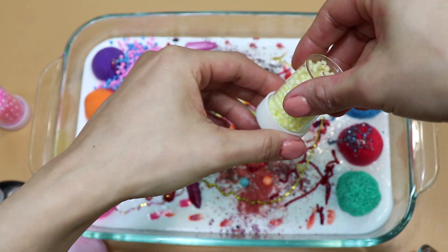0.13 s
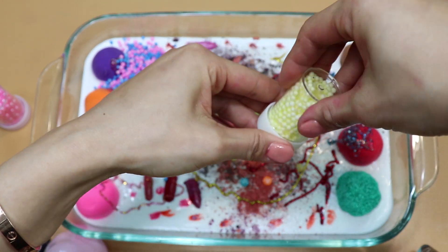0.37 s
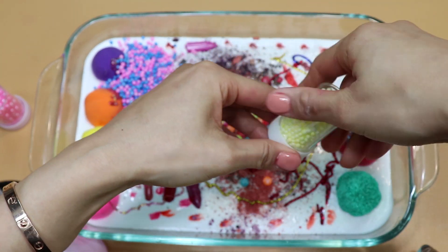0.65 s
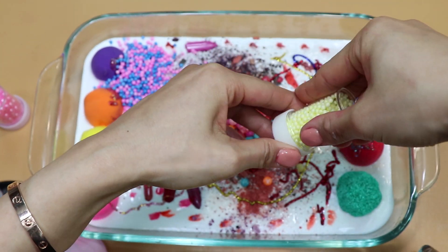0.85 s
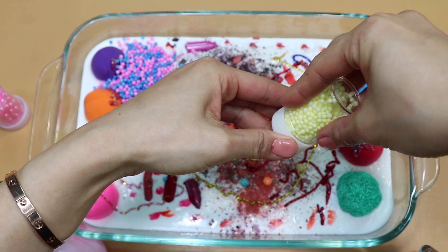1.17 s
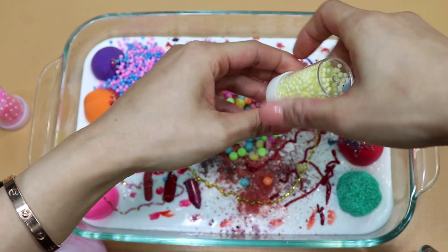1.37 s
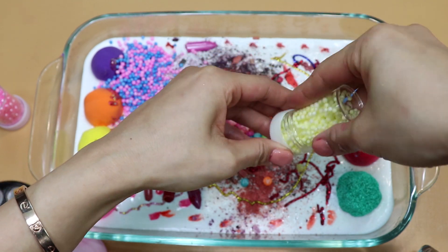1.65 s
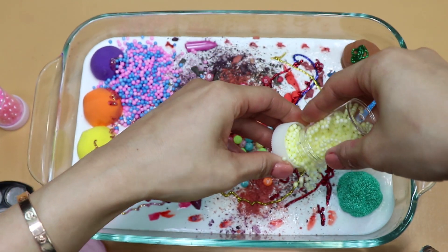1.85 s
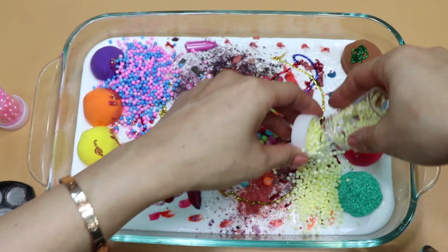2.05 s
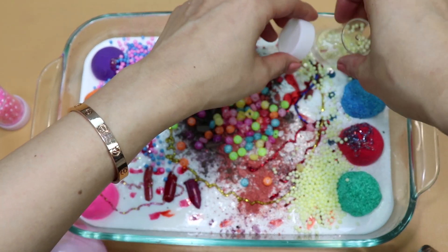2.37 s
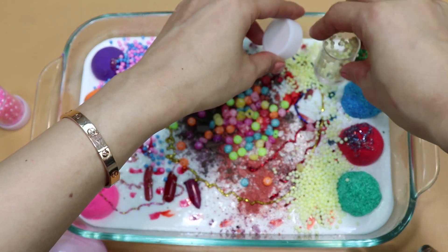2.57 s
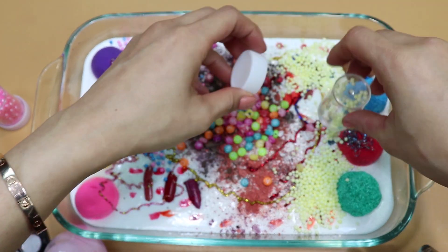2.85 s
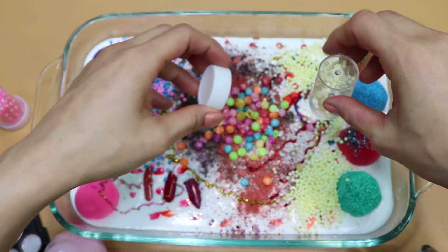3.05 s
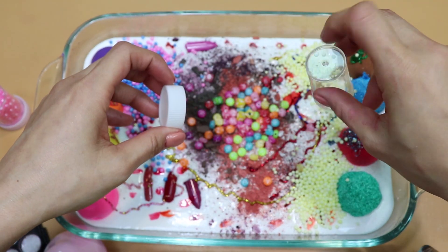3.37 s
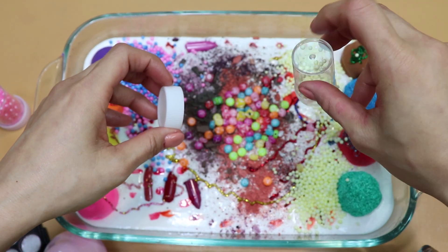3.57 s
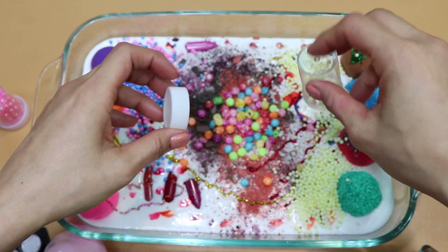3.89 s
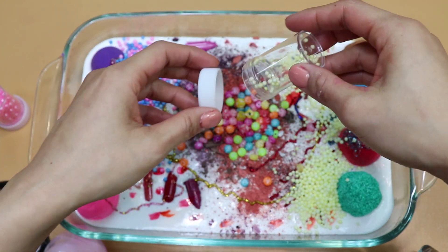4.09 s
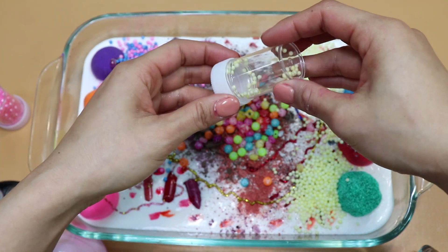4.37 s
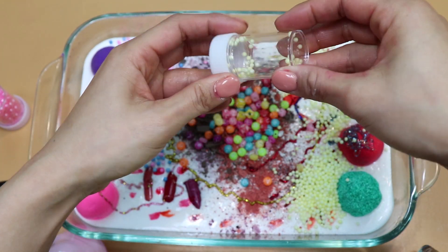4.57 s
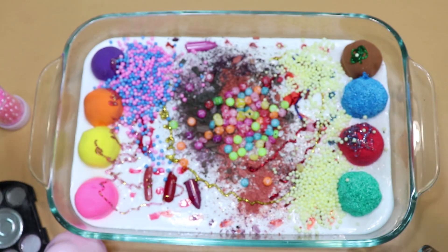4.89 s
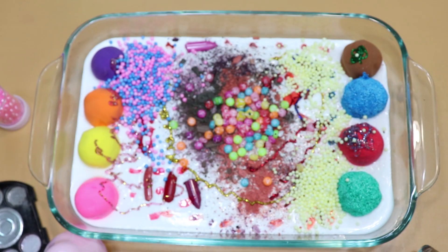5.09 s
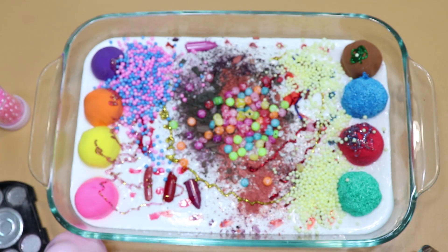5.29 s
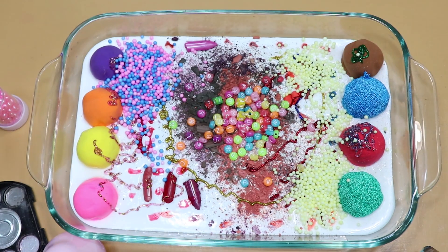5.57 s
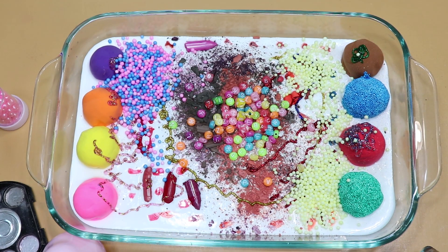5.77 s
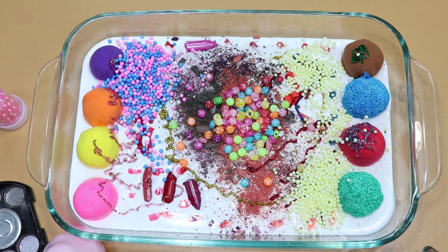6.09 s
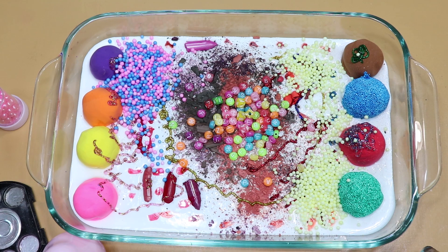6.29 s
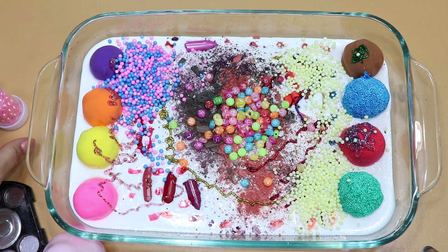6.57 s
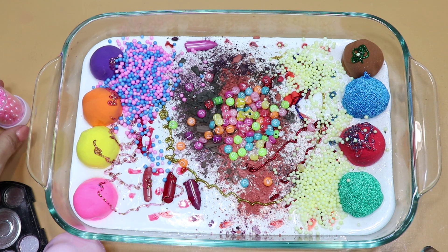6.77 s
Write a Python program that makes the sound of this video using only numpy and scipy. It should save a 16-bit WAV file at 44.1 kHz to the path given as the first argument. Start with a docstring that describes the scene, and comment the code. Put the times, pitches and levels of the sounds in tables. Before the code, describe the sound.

For the first second and a half, fingers slide softly on a small plastic tube, with a few tiny ticks. At about 1.7 seconds the cap pops off with a short, gritty scrape. From 1.8 to 3 seconds foam beads run out in a very faint, fizzy rustle dotted with light ticks. After two small taps near 3 seconds, a fingernail flicks the tube five times between 3.3 and 4 seconds: sharp, bright, quickly dying clicks, loudest near 3.5 and then weakening. At 4.3 seconds the cap goes back on with a smaller click and scrape, followed by soft knocks and rubbing. Faint finger rustle continues, and from 6.6 to 6.9 seconds a hand bumps lightly and scuffs on the table. Everything is close, in a small, quiet room with a steady low hum and hiss.

```python
"""A plastic tube of foam beads

Close up in a small, quiet room, hands turn a little tube, pop its cap, pour out foam beads, flick the
tube with a fingernail and push the cap back on. Flicks and cap are fast-dying resonances of plastic and
air; sliding fingers and running beads are dense grains of friction. A low hum and hiss lie underneath."""
import sys
import numpy as np
from scipy import signal
from scipy.fft import rfft, irfft
from scipy.io import wavfile
from scipy.ndimage import uniform_filter1d

SR = 44100
rng = np.random.default_rng(int(sys.argv[2]) if len(sys.argv) > 2 else 0)


def put_to_file(sound):
    """Save the sound as 16-bit audio at rate SR, in the file named by the first command-line argument."""
    columns = np.atleast_2d(sound).T  # one column per channel
    safe = np.clip(columns, -1, 1)
    whole_steps = np.round(safe * 32767)
    wavfile.write(sys.argv[1], SR, whole_steps.astype(np.int16))


N = 306054

# The tube's voice: the wall's main ring, its upper partner, and the air inside when open.
RING_HZ, OVERTONE_HZ, AIR_HZ = 6453, 12550, 2063


def flicks():
    """A nail snaps on the tube and rings its wall and the air inside, over the thud of the finger."""
    # The wall's modes. Each row: pitch in Hz, level in dB, t60 in seconds.
    wall = [(5000, -19, 0.003), (6030, -0.5, 0.0045), (6800, -7, 0.0025), (7180, 2.5, 0.0058),
            (8000, -7, .003), (8260, 0, 0.0028), (8950, -1, 0.004), (10570, -17, 0.0043),
            (10600, -12, 0.0052), (3280, -30, 0.0037)]
    # Each row: start in seconds, level in dB, left over right in dB, brightness in dB per octave,
    # then ring, overtone, thud and snap in dB relative to the level.
    hits = [(3.0206, -28.5, -2, -10, 8, -2, -1.5, -10), (3.0880, -31, 0, -5, 6.5, -3, -12, 1),
            (3.2961, -3.5, 0, -7, -10.5, -18, -14.5, -8), (3.4813, 0, 0.5, 13, -18, -17, -18.5, -14),
            (3.6698, -4, -0.5, 6.5, -10.5, -11, -18.5, -10), (3.8717, -8.5, -2, -13, -16, -12, -16, -2.5),
            (4.0067, -18.5, -0.5, -22, -9, -16, -16, 5.5)]
    out = np.zeros((2, N))
    for start, db, pan_db, tilt_db, ring_db, overtone_db, thud_db, snap_db in hits:
        place(out, start, struck(wall, tilt_db, rise_s=0.00016), db, pan_db)
        snap = puff(centre_hz=9500, octaves=1.25, t60=0.0068, rise_s=0.0001)
        place(out, start, snap, db + snap_db, pan_db)
        air_db = -33.5 - 0.11 * db  # much the same however hard the blow
        for hz, t60, mode_db in ((RING_HZ, 0.014, db + ring_db), (OVERTONE_HZ, 0.015, db + overtone_db),
                                 (AIR_HZ, 0.012, air_db), (790, 0.0019, db + thud_db)):
            place(out, start, struck([(hz, 0, t60)], tilt_db=0, rise_s=0.00057), mode_db, pan_db)
    return out


def cap():
    """The cap pops off the thread and later seats on the rim; the wider a resonance, the sooner it dies."""
    # Resonances of the pop and the seating. Each row: centre in Hz, width in Hz, level in dB.
    pop_peaks = [(880, 340, 2), (1210, 140, -2), (1740, 390, -1.5), (2750, 1270, 9), (3980, 490, 1.5),
                 (5930, 1100, 0.5), (6930, 650, -5), (8600, 740, -7), (10640, 1100, -4), (13400, 1800, -5)]
    seat_peaks = [(1820, 220, 2), (2250, 500, 5), (2820, 450, -11), (3800, 300, -6), (4810, 200, -2.5),
                  (6570, 110, -6.5), (12400, 800, -35)]
    # Each row: start in seconds, level in dB, left over right in dB, brightness in dB per octave.
    pop_hits = [(1.6495, -36, 0, 1), (1.6833, -4, 1, 1.5), (1.6841, -7, 0, -0.5)]
    seat_hits = [(4.2885, -35, 0, 2), (4.3008, -14.5, -1, 1.5), (4.329, -25.5, 0, -2), (4.333, -38, 0, 6),
                 (4.3405, -26.5, 0, 20)]
    out = np.zeros((2, N))
    for peaks, hits in ((pop_peaks, pop_hits), (seat_peaks, seat_hits)):
        modes = [(hz, db + 20 * np.log10(width), 2.6 / width) for hz, width, db in peaks]
        for start, db, pan_db, tilt_db in hits:
            place(out, start, struck(modes, tilt_db, rise_s=0.00067), db, pan_db)
    return out


def beads(rustle, fizz, ring):
    """Foam beads run out, rubbing the wall and stirring the air in the tube."""
    # The pour. Each row: time in seconds, flow level in dB, fizz in dB relative to the flow.
    pour = [(1.78, -60, -18), (1.93, -61.5, -8), (2.03, -50.5, 0.5), (2.3, -66, -5), (2.38, -64, -6),
            (2.41, -57.5, -3), (2.574, -58, -5), (2.62, -64.5, -4), (2.78, -64, -4), (2.98, -71, -1)]
    times, flow_db, fizz_db = np.transpose(pour)
    t = np.arange(N) / SR
    flow = gain(np.interp(t, times, flow_db)) * (t > times[0]) * (t < times[-1])
    air = resonance(grains(2500, spread_db=4.2, likeness=0.62), AIR_HZ, width_hz=400)
    return flow * (rustle + gain(np.interp(t, times, fizz_db)) * fizz + gain(-16) * ring + gain(-10) * air)


def fingers(rustle, fizz, ring):
    """Fingers slide on the tube, each stroke its own blend of rustle, fizz and rubbed ring."""
    # Each row: peak time, rise and fall in seconds, level in dB, then fizz and ring in relative dB.
    strokes = [(.14, .3, 0.23, -74, -5, -8), (.318, 0.022, 0.034, -57, -2, -7),
               (.415, .04, 0.036, -56.5, -3, -9), (.475, .05, .07, -53.5, -7, -11),
               (.624, 0.031, .025, -61, -8, -8), (.762, 0.06, 0.036, -56, -10, -17),
               (1.25, 1.2, 0.14, -64, -9, -14), (1.402, 0.044, 0.034, -61.5, -8, -9.5),
               (1.598, .13, .04, -55, -8, -15), (4.48, 0.05, .045, -61.5, -4, -13),
               (4.58, .04, 0.037, -71, -10, -1), (4.675, 0.069, 0.058, -56.5, -3, 0.5),
               (4.77, .08, .08, -77, -10, -1), (5.09, 0.47, 0.27, -69, -9, -11),
               (5.24, .04, 0.38, -62, 0.5, -16), (5.62, 0.28, 0.028, -75.5, -11, 11.5),
               (5.68, .05, .25, -67, -17, -10), (6.17, 0.34, .6, -70, -1, -10),
               (6.63, .015, 0.045, -60, -19, -12), (6.81, .1, 0.04, -59.5, -12, -17),
               (6.89, 0.033, .075, -51.5, -8, -20)]
    out = np.zeros((2, N))
    for *shape, fizz_db, ring_db in strokes:
        out += stroke(*shape) * (rustle + gain(fizz_db) * fizz + gain(ring_db) * ring)
    return out


def friction():
    """Rubbed plastic: a broad rustle, a fizz above it, and the wall's two rings kept alive by grains."""
    # Spectra of rustle and fizz. Each row: frequency in Hz, relative level in dB.
    rustle_curve = [(1500, -13), (3500, -6.5), (5500, -1.5), (8000, -5.5), (10500, -11.5), (13000, -17),
                    (16000, -34)]
    fizz_curve = [(6000, -23), (9500, -5.5), (12500, -6), (15700, -12.5), (16200, -38)]
    rustle = colour(grains(9000, spread_db=3.6, likeness=0.65), lambda hz: curve_at(rustle_curve, hz))
    fizz = colour(grains(13000, spread_db=4.9, likeness=0.44), lambda hz: curve_at(fizz_curve, hz))
    ring = resonance(grains(3000, spread_db=5.6, likeness=0.67), RING_HZ, width_hz=180)
    overtone = resonance(grains(3000, spread_db=3.0, likeness=0.49), OVERTONE_HZ, width_hz=800)
    return unit_rms(rustle), unit_rms(fizz), ring + gain(-7) * overtone


def ticks():
    """Ticks, scuffs and dull knocks of skin, nail and plastic; narrow and low ones last longer."""
    # Each row: start in seconds, level in dB, centre in Hz, spread in octaves.
    touches = [(.4554, -37.5, 5840, .27), (.4858, -42, 9000, .9), (0.4967, -30.5, 6400, 1.2),
               (.613, -43, 7400, 1.5), (.623, -42, 6400, 1.5), (.7213, -43, 9000, 0.98),
               (0.8995, -39, 8600, 1.1), (1.517, -43.5, 3100, .7), (1.8208, -37.5, 5500, .66),
               (1.949, -44, 5800, .8), (2.0233, -38, 5830, 0.93), (2.431, -41, 8000, 1.6),
               (2.5182, -36.5, 9000, 1.5), (2.5545, -40.5, 4200, 0.59), (2.655, -48, 4500, 0.27),
               (2.711, -44, 6000, 1.2), (2.7594, -42, 5000, 1.2), (3.4281, -43, 7500, 1),
               (3.4355, -44, 8000, 1.1), (4.4039, -29.5, 550, 1.7), (4.425, -39, 960, 0.97),
               (4.472, -37.5, 4400, .46), (4.576, -36, 1000, 1.6), (4.7638, -44, 4200, .75),
               (6.627, -37.5, 600, 1.16), (6.7465, -40.5, 900, 1.6), (6.7947, -35, 700, 1.03),
               (6.863, -39, 800, 1.4), (6.878, -41.5, 554, 0.22), (6.886, -33, 1500, 0.68)]
    out = np.zeros((2, N))
    for start, db, centre_hz, octaves in touches:
        t60 = 0.011 / octaves * (centre_hz / 6000) ** -0.26
        place(out, start, puff(centre_hz, octaves, t60, rise_s=0.06 * t60), db, pan_db=-1.5)
    return out


def scrapes():
    """Coarse stick-slip grains: the cap's thread scraping, then a hand on the table."""
    # Each row: peak time, rise and fall in seconds, level in dB, brightness in dB per octave.
    drags = [(1.651, 0.0033, 0.032, -44.5, -4.5), (1.684, 0.031, 0.078, -34.5, -4.5),
             (4.336, 0.022, 0.028, -38, -5.5), (4.42, 0.11, 0.041, -50, -14),
             (6.886, 0.041, 0.024, -41, -11)]
    out = np.zeros((2, N))
    for *shape, tilt_db in drags:
        def tone_db(hz):
            roll_off = (1 + (700 / (hz + 1)) ** 6) * (1 + (hz / 12000) ** 4)
            return tilt_db * np.log2((hz + 1) / 1500) - 10 * np.log10(roll_off)
        grit = colour(grains(13000, spread_db=1.1, likeness=0.93), tone_db)
        out += unit_rms(grit) * stroke(*shape)
    return out


def room(near):
    """Early echoes and a short tail; as the hands move, three sets of paths take turns."""
    # The tail's decay. Each row: frequency in Hz, t60 in seconds.
    decay = [(500, 0.15), (1300, 0.33), (3500, 0.22), (9000, 0.26), (16000, 0.2)]
    # Bounces off dish, table and walls. Each row: delay in seconds, level in dB.
    echoes = [(.0022, -15.5), (.0055, -19.5), (0.0129, -18.5), (0.019, -25.5)]
    out = np.zeros((2, N))
    slots = np.arange(130, SR // 2 - 20, 20)  # one random tap in every 20 samples
    for turn in range(3):
        taps = np.zeros((2, SR // 2))
        at = slots + rng.integers(0, 20, (2, len(slots)))
        np.put_along_axis(taps, at, rng.choice([-1., 1.], at.shape), 1)
        hz, t, spectrum = signal.stft(taps, SR, nperseg=256)
        tail = signal.istft(spectrum * gain(-60 * t / curve_at(decay, hz)[:, None]), SR, nperseg=256)[1]
        response = gain(-7) * tail / np.linalg.norm(tail[0])
        for delay, db in echoes:
            response[[0, 1], round(delay * SR) + rng.integers(0, 24, 2)] += gain(db)
        share = np.sqrt(2 / 3) * np.cos(np.pi * (turn / 3 + 1.75 * np.arange(N) / SR))
        out += signal.fftconvolve(near.mean(0)[None] * share, response, axes=1)[:, :N]
    return out


def room_tone():
    """Hiss with wavering bands of hum and whine, centred in the bass and wide in the treble."""
    # The hiss spectrum. Each row: frequency in Hz, relative level in dB.
    hiss_curve = [(20, -34), (45, -24.5), (108, -8), (139, -7), (179, -4), (323, -13.5), (521, -12),
                  (816, -17.5), (1350, -18), (2180, -20.5), (4500, -26), (8890, -28.5), (15700, -37.5),
                  (16200, -65)]
    # Hum and whine. Each row: centre in Hz, width in Hz, level in dB.
    hum_bands = [(59.2, 9, -78), (114.7, 20, -60), (176, 7, -60.5), (192, 11, -61), (360.5, 12.5, -63),
                 (394, 15, -68.5), (487.8, 3.8, -65.5), (8800, 170, -75.5), (9400, 60, -89),
                 (10100, 220, -75), (6830, 160, -75.5)]
    # Stereo image. Each row: frequency in Hz, left-right correlation.
    image = [(60, 0.9), (180, 0.85), (550, 0.61), (1650, 0.12), (4970, -0.091), (15000, 0.059)]
    # The low end swells slowly. Each row: time in seconds, lift in dB under 90 Hz and at 90-230 Hz.
    swell = [(0, -1, -2), (1.8, 2.5, -1), (3.6, 2, -3), (4.4, 2, .5), (5.4, 5, -0.5), (6.2, 3, 2),
             (6.94, 5, -1)]
    frames, hz = N // 1024 + 5, np.fft.rfftfreq(4096, 1 / SR)
    left_re, left_im, apart_re, apart_im, waver = rng.standard_normal((frames, len(hz), 5)).T
    waver = uniform_filter1d(waver, size=40, axis=0)
    waver_db = 0.72 * unit_rms(uniform_filter1d(waver, size=5, axis=1))
    likeness = curve_at(image, hz)[:, None]
    left = left_re + 1j * left_im
    right = likeness * left + np.sqrt(1 - likeness ** 2) * (apart_re + 1j * apart_im)
    hiss = gain(curve_at(hiss_curve, hz)) ** 2
    power = gain(-52.5) ** 2 * hiss / hiss.sum()
    for centre, width, db in hum_bands:
        band = 1 / (1 + ((hz - centre) / (width / 2)) ** 4)
        power += gain(db) ** 2 * band / band.sum()
    times, deep_db, low_db = np.transpose(swell)
    t = np.arange(frames) * 1024 / SR
    deep, low = hz < 90, (hz >= 90) & (hz < 230)
    swell_db = np.outer(deep, np.interp(t, times, deep_db)) + np.outer(low, np.interp(t, times, low_db))
    spectrum = np.array([left, right]) * np.sqrt(power)[:, None] * gain(waver_db + swell_db)
    bed = signal.istft(spectrum, nperseg=4096, noverlap=3072)[1][:, :N]
    return unit_rms(bed) * np.sqrt(power.sum()) * gain([[0.3], [-0.3]])


def struck(modes, tilt_db, rise_s):
    """Dying sines; each blow lands elsewhere, and high modes reach left and right differently."""
    hz, db, t60 = np.transpose(modes)[:, :, None]
    t = np.arange(3000) / SR
    onset, strength, skew, lean = rng.uniform(-1.05, 1, (4,) + hz.shape)
    side = np.array([1, -1])[:, None, None] * hz / 12000
    db = db + tilt_db * np.log2(hz / 5000) + 2 * strength
    db = db + side * (0.6 * lean - 1.5)
    detuned_hz = hz * (1 + 0.01 * lean)
    phase = 1.89 * onset + 1.24 * side * skew
    rings = gain(db - 60 * t / t60) * np.sin(2 * np.pi * detuned_hz * t + phase)
    return rings.sum(1) * np.minimum(t / rise_s, 1)


def puff(centre_hz, octaves, t60, rise_s):
    """A dying burst of band noise, partly different left and right."""
    t, noise = np.arange(4096) / SR, rng.standard_normal((3, 4096))
    stereo = noise[0] + 1.07 * noise[1:]
    band = colour(stereo, lambda hz: -6 * (np.log2((hz + 1) / centre_hz) / octaves) ** 2)
    return band * gain(-60 * t / t60) * (1 - np.exp(-t / rise_s))


def grains(per_s, spread_db, likeness):
    """Random clicks of uneven size: one stream shared by both sides, and one more for each."""
    clicks = rng.standard_normal((3, N)) * (rng.random(N) < per_s / SR)
    clicks *= gain(spread_db * np.minimum(rng.exponential(1, N), 5))
    return likeness * clicks[0] + np.sqrt(1 - likeness ** 2) * clicks[1:]


def resonance(x, centre_hz, width_hz):
    """One narrow, ringing band of a sound, at rms 1."""
    return unit_rms(colour(x, lambda hz: -10 * np.log10(1 + ((hz - centre_hz) / (width_hz / 2)) ** 4)))


def stroke(peak_s, rise_s, fall_s, db):
    """A slightly rounded peak of gain: up 20 dB over the rise, down 20 dB over the fall."""
    t = np.arange(N) / SR - peak_s
    return gain(db - 20 * np.maximum(-t / rise_s, t / fall_s) ** 1.2)


def place(mix, start, sound, db, pan_db):
    """Lays a sound into the mix, scaled to peak at db and then panned."""
    part = mix[:, round(start * SR):][:, :sound.shape[-1]]
    part += gain(db + np.array([[0.5], [-0.5]]) * pan_db) * sound[..., :part.shape[1]] / abs(sound).max()


def colour(x, db_of_hz):
    """Equalises a sound with a curve in dB."""
    hz = np.fft.rfftfreq(x.shape[-1], 1 / SR)
    return irfft(rfft(x) * gain(db_of_hz(hz)), x.shape[-1])


def curve_at(points, hz):
    """Reads a curve on a log frequency axis."""
    point_hz, value = np.transpose(points)
    return np.interp(np.log(hz + 1), np.log(point_hz + 1), value)


def gain(db):
    """Decibels to gain."""
    return 10 ** (np.asarray(db) / 20)


def unit_rms(x):
    """Scales to rms 1."""
    return x / np.sqrt(np.mean(x ** 2) + 1e-20)


def scene():
    """The close sounds, their room and its tone; things this small radiate no bass."""
    near = flicks() + cap() + ticks()
    textures = friction()
    near += beads(*textures) + fingers(*textures) + scrapes()
    near = signal.sosfilt(signal.butter(3, 420, "high", fs=SR, output="sos"), near)
    return near + room(near) + room_tone()


def record(dry):
    """A steep low-pass trims the top at 16.8 kHz."""
    low_pass = signal.firwin(255, 16800, window=("kaiser", 9), fs=SR)
    return signal.oaconvolve(dry, low_pass[None], "same")


dry = scene()
out = record(dry)
put_to_file(out)
```